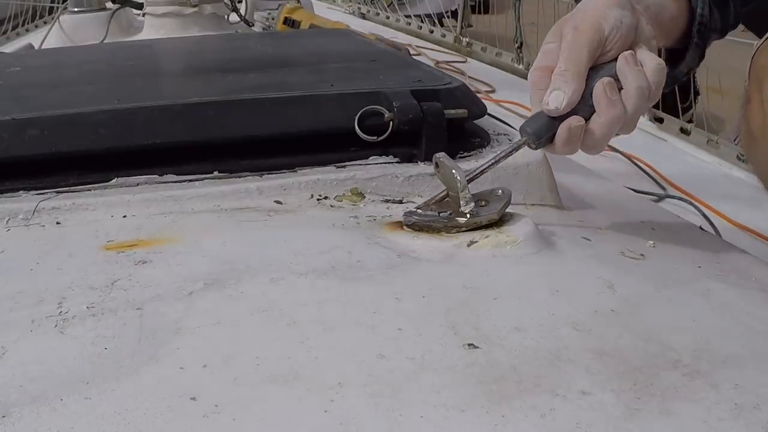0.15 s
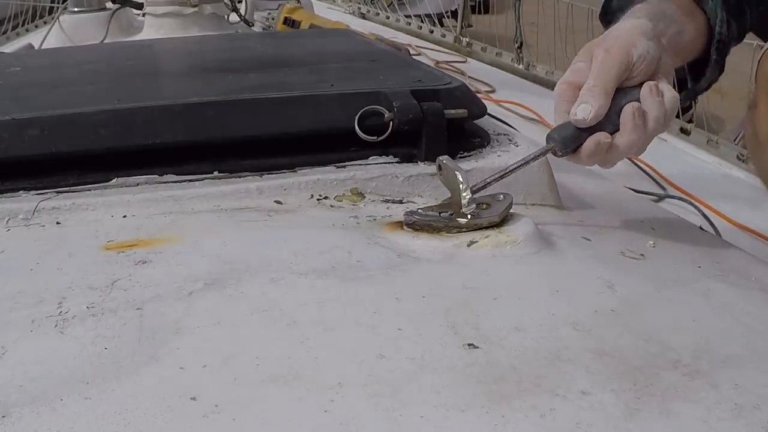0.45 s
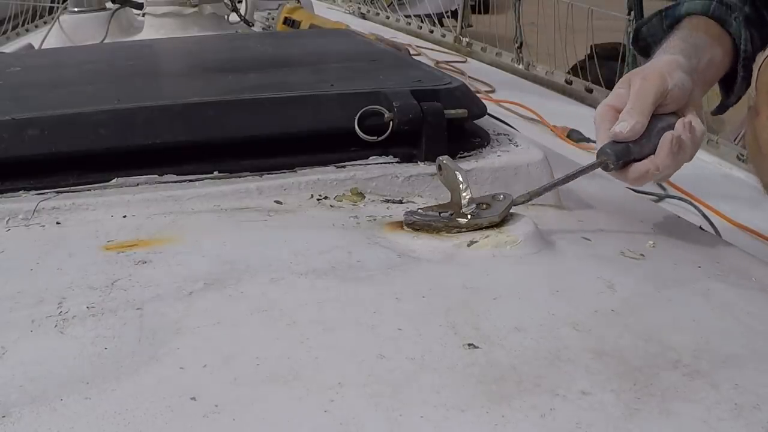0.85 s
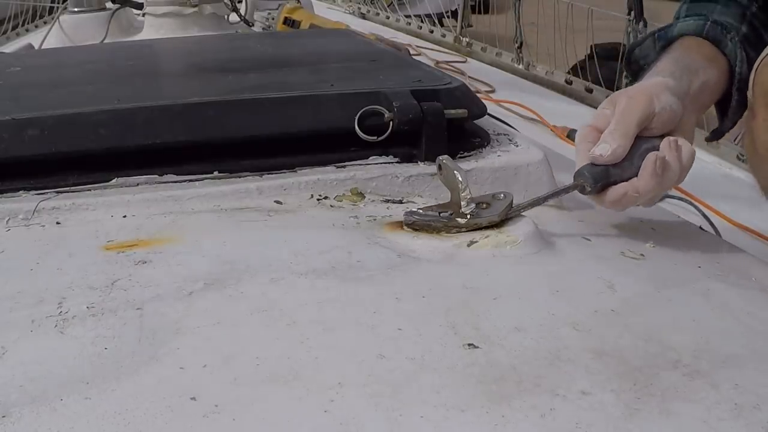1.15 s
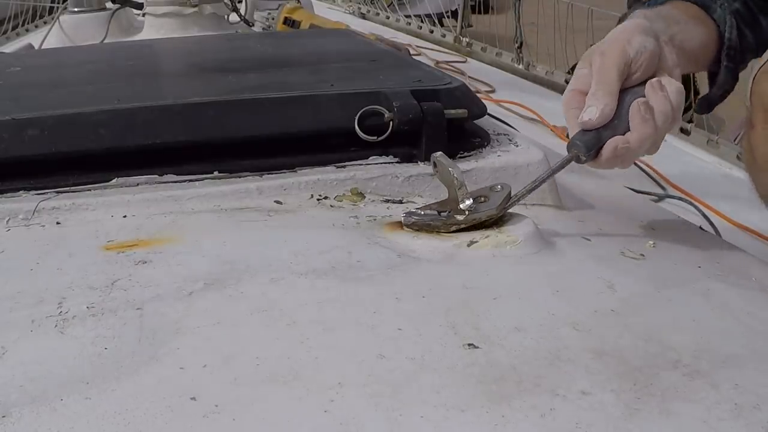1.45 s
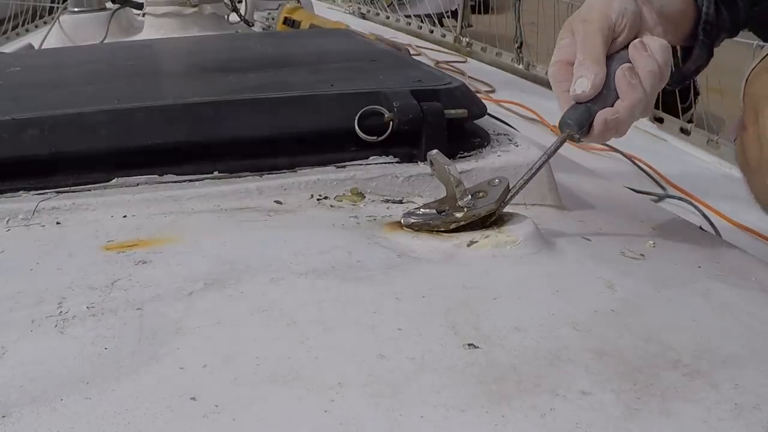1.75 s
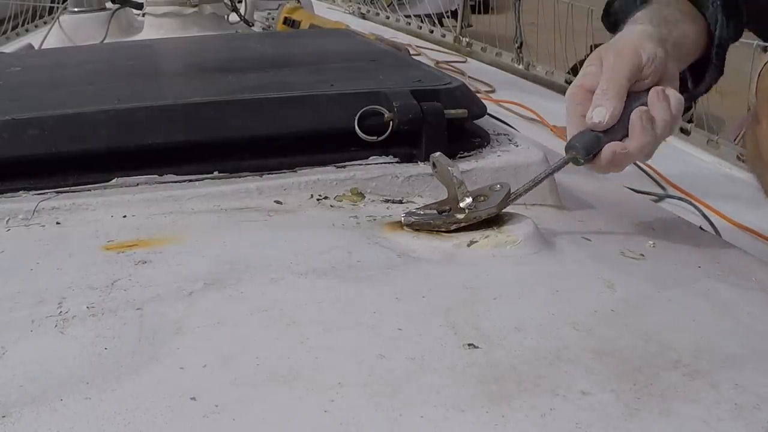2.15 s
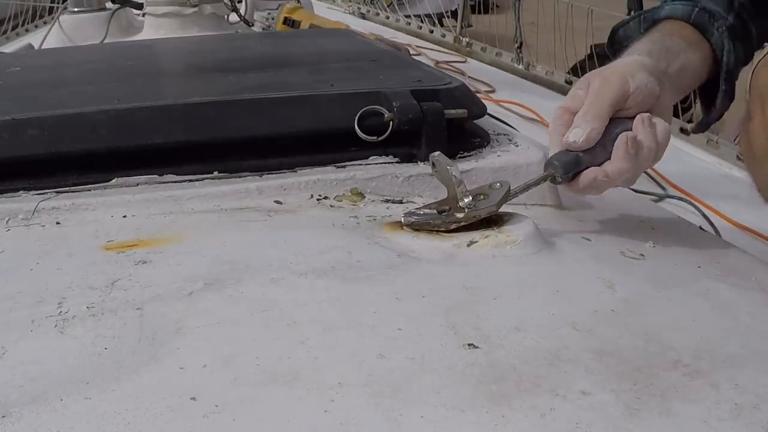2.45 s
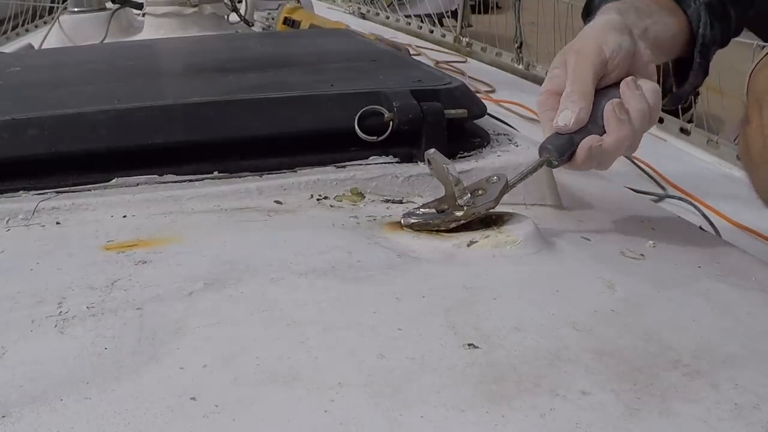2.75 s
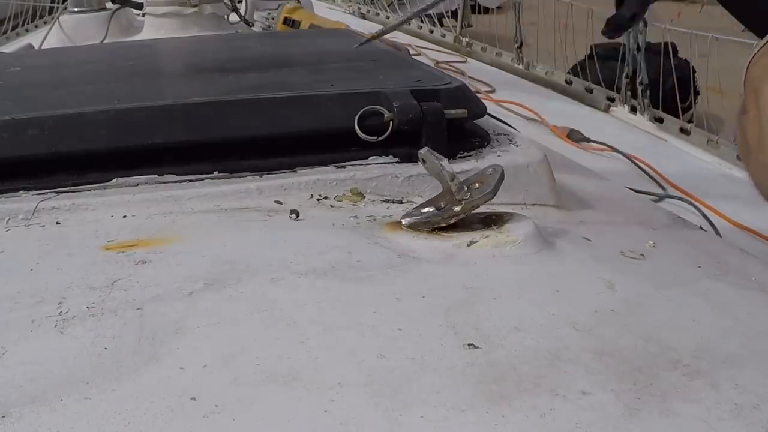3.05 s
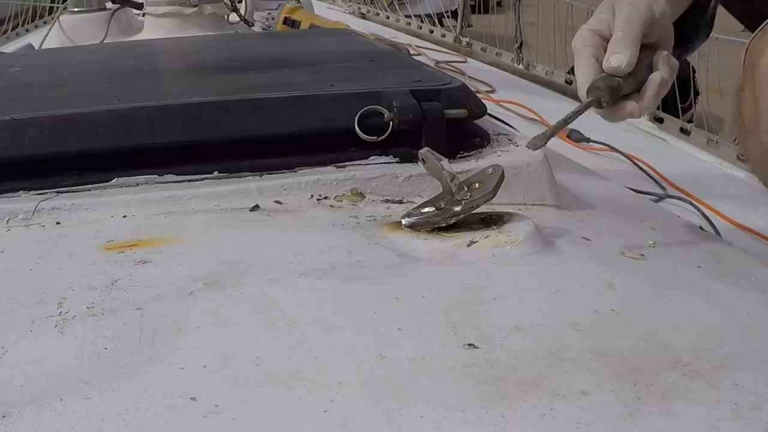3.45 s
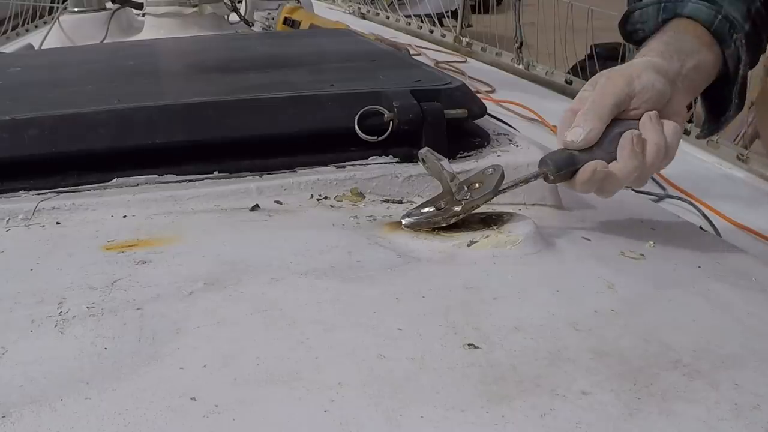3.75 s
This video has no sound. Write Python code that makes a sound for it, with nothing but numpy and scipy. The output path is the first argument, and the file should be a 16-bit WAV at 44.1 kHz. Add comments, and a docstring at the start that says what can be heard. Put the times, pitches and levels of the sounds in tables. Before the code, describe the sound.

A screwdriver pries a metal bracket off a boat deck, heard close outdoors. Small dry ticks and a scrape come at 0.3-0.5 s, metallic clinks at 1.0, light ticks from 1.3 to 2.1, a sharper click at 2.35. A hard crack thumps the deck at 2.8, then ringing snaps at 3.0 and a faint scrape. Wind buffets strongly around 3.4; a last clink at 3.7. Faint engine hum and hiss continue underneath.

```python
"""A hum over steady hiss and gusty wind, then ticks, short scrapes, metal rings and dull thumps: a screwdriver
pries a metal bracket off a boat deck while a distant engine runs. The hum is wavering sines on multiples of a
shaft's turning; hiss, wind and rumble are shaped noise. Ticks and scrapes are grit that cracks drily and rings
the blade's modes; the hardest blows thump the deck, and wind buffets the two microphone ports separately."""
import sys
import numpy as np
from scipy import signal
from scipy.io import wavfile
from scipy.ndimage import uniform_filter1d

SR = 44100
rng = np.random.default_rng(int(sys.argv[2]) if len(sys.argv) > 2 else 0)


def digitize_waveform(pressure):
    """Quantize a signal to 16-bit integers and store it at the path in sys.argv[1].

    Rows of a 2-D input are taken as channels; values are limited to [-1, 1].
    """
    field = np.atleast_2d(pressure).T
    bounded = np.clip(field, -1, 1)
    quanta = np.round(bounded * 32767).astype(np.int16)
    wavfile.write(sys.argv[1], SR, quanta)


N = 171990  # length [samples]
EDGE_HZ = 14600  # top of the audible band


def gain_of(db):
    """Decibels to an amplitude factor."""
    return 10 ** (np.asarray(db) / 20)


def evened(x):
    """Scale to an rms of 1."""
    return x / np.sqrt(np.mean(x ** 2) + 1e-20)


def peaked(x):
    """Scale to a peak of 1."""
    return x / abs(x).max()


def read(points, hz):
    """Read a curve of (frequency, value) points, straight-lined over log frequency."""
    f, value = np.transpose(points)
    return np.interp(np.log(hz + 1), np.log(f + 1), value)


def add(mix, start_s, sound):
    """Lay a sound into the mix at its start time, cut at the mix's end."""
    part = mix[..., round(start_s * SR):][..., :sound.shape[-1]]
    part += sound[..., :part.shape[-1]]


def drift(rate_hz, t):
    """Random wandering of rms 1: sines up to the rate, the slower ones stronger."""
    wander = 0
    for f in np.geomspace(rate_hz / 20, rate_hz, 24):
        wander = wander + np.sin(2 * np.pi * (f * t + rng.random())) / np.sqrt(f)
    return evened(wander)


def noise(spectrum, same, size, patch_db):
    """Two partly alike channels of shaped noise, its level drifting in patches of pitch and time."""
    hop = size // 4
    hz = np.fft.rfftfreq(size, 1 / SR)
    a, b, c, d, patches = rng.standard_normal((N // hop + 5, len(hz), 5)).T
    patches = uniform_filter1d(patches, size=6, axis=0)  # across frequency
    patches = evened(uniform_filter1d(patches, size=5, axis=1))  # along time
    same = np.clip(same * np.ones(len(hz)), -1, 1)[:, None]
    left = a + 1j * b
    right = same * left + np.sqrt(1 - same ** 2) * (c + 1j * d)
    shape = gain_of(read(spectrum, hz)[:, None] + patch_db * patches)
    frames = np.array([left, right]) * shape
    return evened(signal.istft(frames, nperseg=size, noverlap=size - hop)[1][:, :N])


def engine(t):
    """Engine hum: multiples of one shaft speed, its pitch and each multiple's level wavering."""
    shaft_hz, waver, level_waver_db = 27.3, .005, .8
    # strongest shaft multiples: (multiple of the shaft speed, level within the background [dB])
    orders = [(2, 23), (5, 27.5), (7, 15), (8, 13)]
    turns = np.cumsum(shaft_hz * (1 + waver * drift(6.8, t))) / SR
    hum = 0
    for multiple, db in orders:
        level = gain_of(db + level_waver_db * drift(16.0, t))
        hum = hum + level * np.sin(2 * np.pi * (multiple * turns + rng.random()))
    return hum


def hiss():
    """Steady hiss: shaped noise whose likeness between the ports changes with frequency."""
    # colour of the hiss: (frequency [Hz], relative level [dB])
    colour = [(290, -29), (500, -6), (866, -1.5), (1400, -5.5), (1910, -10.5), (3540, -16), (4830, -23),
              (6590, -16), (7500, -21.5), (8200, -27.5), (12600, -35), (14500, -92)]
    # how alike the ports are: (frequency [Hz], left-right likeness [-1 to 1])
    likeness = [(60, 0.04), (240, 1), (930, -0.32), (3650, 0.71), (14300, -0.44)]
    same = read(likeness, np.fft.rfftfreq(1024, 1 / SR))
    return gain_of(11) * noise(colour, same, size=1024, patch_db=2.5)


def background(t):
    """Hum and hiss under one common level curve."""
    # shared fader of hum and hiss: (time [s], gain [dB])
    fader = [(0, -51.5), (3.35, -52), (3.6, -56), (3.9, -62)]
    return gain_of(np.interp(t, *np.transpose(fader))) * (engine(t) + hiss())


def gusts(t):
    """Wind buffeting: lumpy low noise, swelling by its own amount at each port over a breeze."""
    lump_db, same = 2., -0.41
    # wind between gusts: (time [s], level before the lumps [dB])
    breeze = [(0, -29), (1, -25.5), (3.6, -24), (3.9, -31)]
    # swells added to the breeze, width between the 1/e points:
    # (centre [s], width [s], left level before the lumps [dB], right level before the lumps [dB])
    swells = [(0.69, 0.023, -48, -16.5), (.845, 0.29, -37, -28.5), (1.17, 0.41, -14.5, -19),
              (1.311, 0.049, -17.5, -21), (1.779, 0.065, -14.5, -13), (1.949, 0.015, -18, -8),
              (2.396, 0.031, -17, -15.5), (2.572, 0.04, -19.5, -26), (3.176, 0.025, -29, -16),
              (3.29, 0.12, -22, -17.5), (3.384, 0.1, -10, -7.5), (3.534, 0.1, -8.5, -13)]
    # colour of the buffeting: (frequency [Hz], relative level [dB])
    colour = [(15, -10.5), (60, 2), (230, -1.5), (420, -12), (850, -33), (2000, -44), (4000, -104)]
    level = gain_of(np.interp(t, *np.transpose(breeze))) * np.ones((2, 1))
    for centre_s, width_s, *db in swells:
        level = level + gain_of(db)[:, None] * np.exp(-(2 * (t - centre_s) / width_s) ** 2)
    lumps = lump_db * np.array([drift(60., t), drift(60., t)])
    return level * gain_of(lumps) * noise(colour, same, size=512, patch_db=4.0)


def rumble(t):
    """Low wind rumble: dark noise of wavering level, stronger on the left."""
    level_db, waver_db, pan_db = -23.5, 1.5, 4.5
    # colour of the rumble: (frequency [Hz], relative level [dB])
    colour = [(15, 4), (55, 16.5), (100, 12.5), (200, 4.5), (800, -59)]
    pan = gain_of([[pan_db / 2], [-pan_db / 2]])
    panned = noise(colour, 0.3, size=4096, patch_db=-0.5) * pan
    return gain_of(level_db + waver_db * drift(3.6, t)) * panned


def ring(modes, extra_db=0, tune=1, held=1, phase=0):
    """The dying sines of a struck object; neighbouring modes start in opposite directions."""
    hz, db, t60 = np.transpose(modes)[:, :, None]
    t = np.arange(SR // 8) / SR
    flip = np.pi * np.arange(len(modes))[:, None]
    level = gain_of(db + extra_db - 60 * t / (t60 * held))
    return (level * np.sin(2 * np.pi * hz * tune * t + phase + flip)).sum(0)


def ports(shared, apart):
    """A shared sound, stronger on the right, and a weaker part of opposite sign at the two ports."""
    pan_db, apart_db = -2, -8.5
    pan = gain_of([[pan_db / 2], [-pan_db / 2]])
    return pan * (shared + gain_of(apart_db) * np.array([apart, -apart]))


def blade(drive, centre_hz, detune):
    """The drive rings the screwdriver's blade, varied at each contact; modes near the contact's centre lead."""
    spread_db, fall_db = 2., -11.  # random mode level; ring lost per octave from the centre
    held = .75  # being held shortens every decay
    # modes of the blade: (frequency before detuning [Hz], relative level [dB], free t60 [s])
    modes = [(1080, -17, .015), (1400, -7, .035), (1600, -2, .03), (1780, 0, .03), (1990, -3, .022),
             (2650, -15, .018), (4300, -9, .03), (4590, -3, .035), (6050, -7, .022), (6430, -2, .028),
             (6900, -6, .02)]
    favour_db = fall_db * abs(np.log2(np.transpose(modes)[0] / centre_hz))[:, None]
    spread_one, spread_other, shift = rng.standard_normal((3, len(modes), 1))
    tune = 1 + detune * shift
    shared = ring(modes, favour_db + spread_db * spread_one, tune, held, 0)
    apart = ring(modes, favour_db + spread_db * spread_other, tune, held, np.pi / 2)
    return ports(signal.fftconvolve(drive, shared), signal.fftconvolve(drive, apart))


def crack(grit, centre_hz):
    """Dry contact: two strands of grit through one broad resonance."""
    octaves = .9  # width of the resonance
    edges = centre_hz * 2 ** (octaves * np.array([-.5, .5]))
    b, a = signal.butter(1, np.minimum(edges, EDGE_HZ), "band", fs=SR)
    return ports(*signal.lfilter(b, a, grit))


def tick(crack_db, ring_db, centre_hz):
    """A gritty broad crack at the contact, and the metal ringing briefly."""
    rise_s, decay_s, snap = .0004, .0016, 4
    t = np.arange(800) / SR
    grit = rng.standard_normal((2, len(t))) * np.minimum(t / rise_s, 1) * np.exp(-t / decay_s)
    grit[0, round(rise_s * SR)] = snap  # the first snap stands above the grit
    sound = gain_of(ring_db) * peaked(blade(grit[0], centre_hz, detune=.015))
    add(sound, 0, gain_of(crack_db) * peaked(crack(grit, centre_hz)))
    return sound


def scrape(length_s, level_db, centre_hz):
    """Uneven slips of the blade under one stroke: the metal rings over a dry rasp."""
    slips_per_s, rasp_db = 3500, -7
    t = np.arange(0, length_s, 1 / SR)
    chance, push, size = rng.random((len(t), 3)).T
    slips = (chance < slips_per_s / SR) * (push - .5) * gain_of(-3. * np.log(size + .05))
    slips = slips * np.sin(np.pi * (t / length_s) ** 1.5)  # builds up, lets go quickly
    sound = peaked(blade(slips, centre_hz, detune=.0075))
    add(sound, 0, gain_of(rasp_db) * peaked(crack([slips, slips[::-1]], centre_hz)))
    stroke_rms = np.sqrt((sound ** 2).sum() / 2 / len(t))
    return gain_of(level_db) * sound / stroke_rms


def contacts():
    """All ticks and scrapes of the screwdriver on the bracket, dull at the very top."""
    dull_hz, top_db = 7500, -25
    # single contacts, peaks before the dulling:
    # (start [s], crack peak [dB], ring peak [dB], centre of the contact [Hz])
    ticks = [(0.2844, -27.5, -53, 3700), (0.3065, -20, -50, 12000), (0.357, -18.5, -26.5, 5500),
             (0.444, -15, -47, 5330), (0.4743, -33, -36, 4200), (1.0037, -32, -13, 2700),
             (1.0302, -48, -24.5, 2380), (1.3126, -19.5, -48, 3200), (1.4378, -19.5, -28, 3180),
             (1.731, -23, -37, 2960), (1.856, -35, -34, 6000), (1.9137, -29.5, -38, 3500),
             (2.0653, -20, -40, 6040), (2.3499, -7, -17, 5900), (2.812, -1, -23, 2260),
             (2.8474, -30, -22.5, 7200), (2.86, -12, -42, 4900), (2.887, -26, -43, 12500),
             (2.901, -8, -25, 8800), (2.9676, -20, -21.5, 2460), (2.9902, -10, -11, 2870),
             (3.0088, -5, -20, 5900), (3.693, -11.5, -11, 4940), (3.769, -25.5, -42, 5500)]
    # strokes: (start [s], length [s], level before the dulling [dB], centre of the contact [Hz])
    scrapes = [(0.328, 0.055, -42, 1600), (0.445, 0.05, -39, 4140), (1.009, 0.045, -31.5, 2270),
               (1.041, 0.02, -28, 2180), (2.304, 0.068, -34.5, 1340), (2.349, 0.039, -42.5, 3530),
               (2.854, 0.025, -41.5, 6000), (2.966, 0.038, -31, 2200), (2.998, 0.016, -14.5, 2320),
               (3.006, 0.02, -29.5, 4970), (3.037, 0.17, -49.5, 5070), (3.72, 0.033, -41.5, 5100)]
    out = np.zeros((2, N))
    for start_s, *settings in ticks:
        add(out, start_s, tick(*settings))
    for start_s, *settings in scrapes:
        add(out, start_s, scrape(*settings))
    dull = signal.sosfilt(signal.butter(6, dull_hz, fs=SR, output="sos"), out)
    return dull + gain_of(top_db) * (out - dull)


def deck_thumps():
    """The hardest blows ring the deck, which shakes the ports in opposite phase."""
    # blows: (start [s], gain [dB])
    blows = [(2.813, 0.5), (2.993, -12), (3.011, -13)]
    # modes of the deck: (frequency [Hz], relative level [dB], t60 [s])
    modes = [(244, -0.5, 0.14), (293.2, -4, 0.16), (774, 3.5, 0.0078)]
    out = np.zeros((2, N))
    for start_s, db in blows:
        add(out, start_s, gain_of(db) * ring(modes) * [[1], [-0.51]])
    return out


def freed_blade():
    """The blade springs free and its shaft rings, swelling in briefly, alike at both ports."""
    start_s, level_db, rise_s = 3.0125, -12, .0016
    # modes of the screwdriver's shaft: (frequency [Hz], relative level [dB], t60 [s])
    modes = [(4570, 0, .026), (12960, -34, .12)]
    free = ring(modes) * np.minimum(np.arange(SR // 8) / (rise_s * SR), 1)
    out = np.zeros((2, N))
    add(out, start_s, gain_of(level_db) * np.array([free, free]))
    return out


def scene():
    """Engine and hiss, wind, and the tool at work, summed."""
    t = np.arange(N) / SR
    wind = gusts(t) + rumble(t)
    tool = contacts() + deck_thumps() + freed_blade()
    return background(t) + wind + tool


def record(dry):
    """A soft ceiling on the peaks, then the band limit."""
    ceiling = .96
    soft = dry / (1 + (abs(dry) / ceiling) ** 4) ** .25
    low_pass = signal.firwin(511, EDGE_HZ, window=("kaiser", 9), fs=SR)
    return signal.oaconvolve(soft, low_pass[None], "same")


dry = scene()
out = record(dry)
digitize_waveform(out)
```